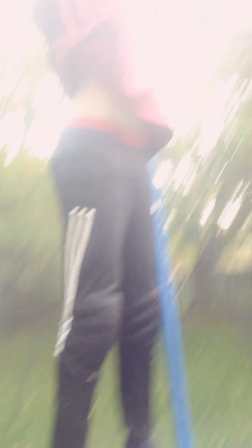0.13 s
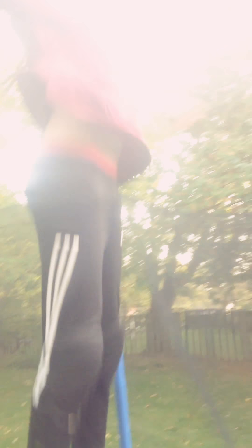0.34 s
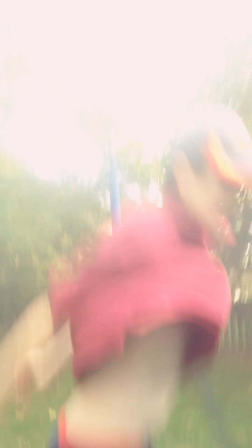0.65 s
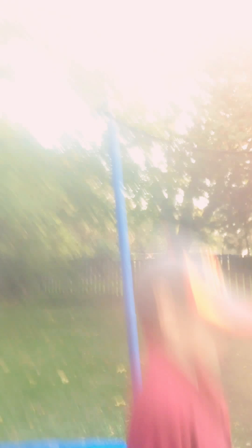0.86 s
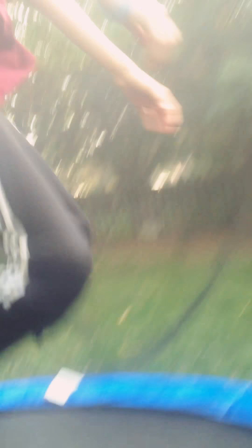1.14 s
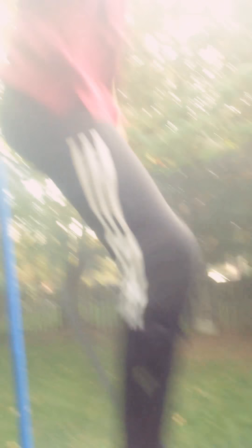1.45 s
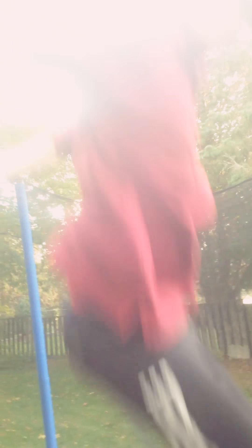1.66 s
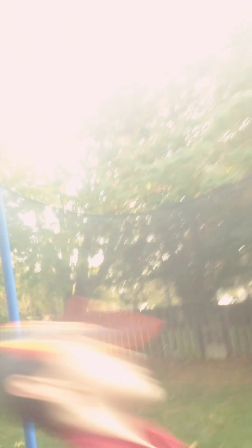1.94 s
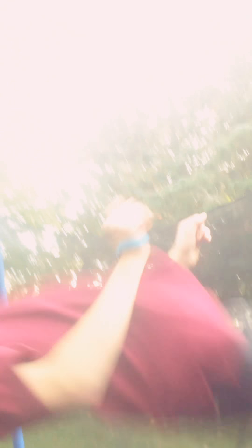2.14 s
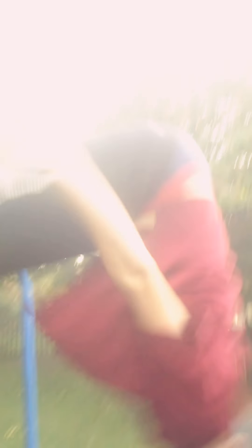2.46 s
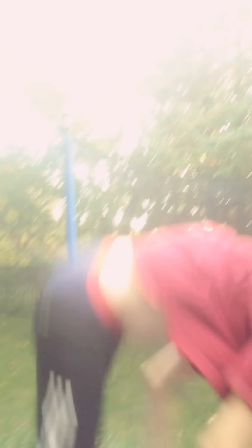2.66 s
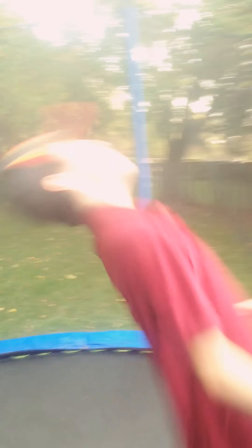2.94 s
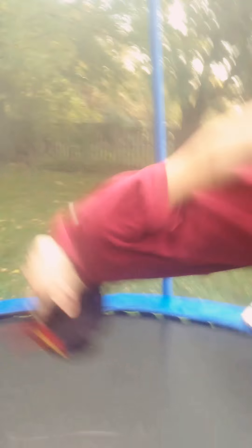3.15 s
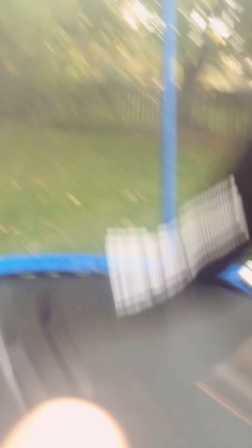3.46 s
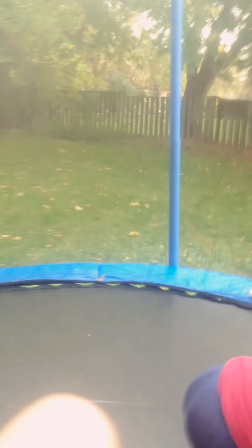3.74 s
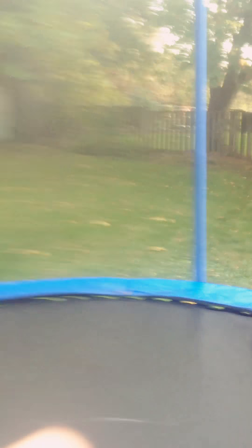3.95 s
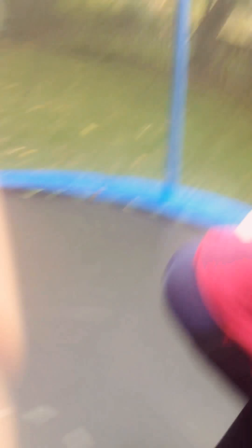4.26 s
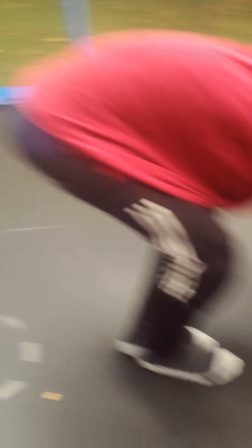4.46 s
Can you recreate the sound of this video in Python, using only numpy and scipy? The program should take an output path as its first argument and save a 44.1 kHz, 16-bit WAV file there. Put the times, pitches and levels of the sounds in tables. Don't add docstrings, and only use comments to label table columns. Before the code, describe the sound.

Close handheld phone in an open garden with almost no echo. Trampoline springs are already jangling, then three landings about a second apart bring dense bright steel rattle and dull mat thumps, the third hardest. Loose rings ping and wires tick between them. A heavier scramble of thuds and a sharp rattle follows, then the springs settle over faint leaves and distant traffic.

```python
import sys
import numpy as np
from scipy import signal
from scipy.fft import rfft, irfft
from scipy.io import wavfile
from scipy.ndimage import uniform_filter1d

SR = 44100
rng = np.random.default_rng(int(sys.argv[2]) if len(sys.argv) > 2 else 0)


def invert_db(x):
    u = np.asarray(x, float) / 20
    return 10 ** u


def transcribe(u):
    v = np.clip(np.atleast_2d(u).T, -1, 1)
    q = np.round(v * 32767).astype(np.int16)
    wavfile.write(sys.argv[1], SR, q)


N = 203054

# frequency in Hz, density in dB per Hz.
GARDEN_SPECTRUM = [(25, -33), (50, -12), (100, -7), (160, -2), (500, 1), (1000, 0), (1600, -3), (2100, -7),
                   (3200, -10), (4200, -7), (5300, -4.5), (6300, -10), (8000, -20), (12000, -32.5),
                   (15500, -24)]
# start in
# seconds, level in dB, tone in Hz, T60 in seconds.
KNOCKS = [(.745, -52, 100, .07), (1.845, -52, 105, .07), (3.6, -50, 110, .09), (4.3505, -34, 4600, .008),
          (4.564, -47, 4300, .012), (.579, -58, 326, .05), (.609, -52, 410, .045), (.606, -60, 190, .05),
          (.33, -45, 1290, 0.013), (.33, -40.5, 3220, 0.011), (1.178, -45.5, 1330, 0.015),
          (1.37, -60, 1538, .1), (1.46, -62, 1580, 0.045), (2.1, -54, 480, 0.044), (2.3, -56, 474, 0.035),
          (2.52, -53, 1650, 0.014), (2.52, -51, 3380, 0.014), (2.61, -60, 1620, 0.04),
          (4.42, -53, 1050, 0.016)]
# start in seconds, then levels in dB of tick, top tone, middle tones, low tone.
PINGS = [(.1277, -36, -37, -35.5, -40), (.2673, -37, -42, -55, -49), (.3483, -38, -43, -44, -41),
         (.588, -45, -54, -64, -53), (1.077, -25, -53, -43, -47), (1.2261, -37, -43, -43, -40),
         (1.467, -20, -42, -46, -46), (2.0842, -33, -38, -34, -31), (2.2024, -24, -49, -43, -54),
         (2.2697, -52, -58, -47, -34), (2.374, -32, -50, -37, -42), (2.3974, -15, -38, -34, -41),
         (2.4628, -50, -67, -42, -39.5), (2.591, -37, -38, -54, -36), (2.6993, -46, -56, -54, -37),
         (2.7093, -46, -44, -48, -37), (2.9028, -34, -31, -45, -21), (3.008, -44, -24, -31.5, -24),
         (3.1938, -35, -41, -30, -38), (3.3149, -46, -49, -46, -41), (3.8544, -43, -44, -41, -36),
         (3.9694, -45, -45, -50, -29), (4.1372, -36, -38, -33, -38.5), (4.4173, -50, -45, -60, -34.5)]
RING_HZ = [15090, 11780, 10010, 4090]
# split in Hz, T60 in seconds.
RING_PAIRS = [(95, 0.087), (40, 0.041), (70, 0.051), (30, 0.026)]
# start in seconds, peak in dB, centre in Hz, treble share in dB.
TICKS = [(.2664, -14, 4810, -32), (.3014, -34, 4200, -19), (.3313, -17, 3180, -31), (.3677, -28, 5610, -40),
         (.578, -40, 4170, -21), (.586, -25, 5500, -30), (1.2245, -25, 5270, -24), (1.264, -21, 4170, -35),
         (1.3214, -24, 5510, -25), (1.3488, -24, 4910, -28), (1.466, -26, 4040, -16),
         (1.5678, -47, 4950, -36), (2.2513, -26, 4020, -37), (2.387, -21, 3890, -16),
         (2.4002, -19.5, 4040, -10), (2.4144, -24, 5220, 0), (2.4633, -32, 4000, -26),
         (2.4892, -39, 3470, -28), (2.5666, -31, 4930, -22), (2.5905, -19.5, 4280, -21),
         (2.7051, -18.5, 4300, -32), (2.711, -22, 3950, -30), (2.7402, -33, 4370, -43),
         (2.7733, -28, 4160, -40), (2.802, -42, 4610, -29), (3.531, -30, 4290, -42),
         (4.3505, -23, 4650, -45), (4.564, -32, 4290, -35)]
# frequency in Hz, density in dB per Hz.
BOOM_SPECTRUM = [(18, -36), (30, -51), (95, -2), (156, 1.5), (337, -2), (524, -5), (613, -10), (900, -18.5),
                 (1170, -37), (1980, -120)]
# time in seconds, boom in dB.
SAGS = [
    (.02, -51),
    (.91, -44),
    (2.01, -41.5),
    (2.28, -54),
    (2.96, -39),
    (3.77, -43.5),
]
# start in seconds, peak in dB, pitch in Hz, slap share in dB.
THUDS = [(.208, -44, 170, -13), (.746, -24.5, 183, -25), (.876, -21, 176.5, -7), (.994, -41, 128, -17),
         (1.842, -22, 165, -19.5), (1.861, -29, 158, -15.5), (1.975, -25.5, 182, -7),
         (2.789, -19.5, 199, -20.5), (2.801, -29, 161, -19), (2.909, -20, 212, -10),
         (2.924, -23.5, 140, -9.5), (3.591, -14.5, 166, -16), (3.608, -30, 170, -18.5),
         (3.667, -28, 204, -11), (3.692, -19, 211, -18), (3.709, -28, 217, -8), (3.747, -35, 172, -19),
         (3.767, -21, 127, -13.5), (3.789, -30.5, 168, -12)]
# frequency in Hz, density in dB per Hz.
RATTLE_SPECTRUM = [(500, -31), (800, -15.5), (1300, -12), (1900, -5.5), (2500, -6), (3200, -6),
                   (4000, -2.5), (5000, 0), (6300, -7), (8000, -15.5), (9700, -23.5), (10900, -40),
                   (12300, -24), (15500, -32)]
# frequency in Hz, level in dB.
COILS = [(1380, -5), (1690, -7.5), (1868, -4.5), (2240, -19), (2634, 3), (3108, -26), (3283, -22),
         (3521, -6.5), (3786, -4), (4048, 9), (4230, -7), (4377, 6), (4560, -9), (4790, -5), (4927, 8),
         (5067, 6), (5186, -2.5), (5330, 5), (5491, 7), (5648, -2.5), (5787, 5.5), (6190, -1), (6546, -8),
         (7100, -7)]
# start in seconds, peak in dB.
JERKS = [(.057, -12), (.144, -7), (.1855, -15), (.7985, -6), (.8744, -20), (.9807, -15), (1.1297, -15),
         (1.3488, -11), (1.8754, -14), (1.9994, -23), (2.0544, -8), (2.253, -16), (2.5666, -24),
         (2.7721, -19), (2.8015, -18), (2.8437, -3.5), (2.863, -3), (2.894, -3), (2.912, -3),
         (3.3463, -15.5), (3.529, -15), (3.6896, 4), (3.808, -6), (3.843, -9), (4.0894, -17), (4.3505, -18),
         (4.564, -19)]
# time of strongest rattle in seconds, level in dB,
# rise and fall in seconds per 20 dB.
LANDINGS = [
    (.88, -17.5, .104, .055),
    (1.94, -18, .068, .105),
    (2.914, -15, .08, .045),
]
# time of strongest rattle in seconds, level in dB,
# rise and fall in seconds per 20 dB.
SWELLS = [(.066, -30, .2, .18), (.44, -52.5, .07, .23), (1.02, -21.5, .12, .18), (1.58, -47, .03, .035),
          (1.738, -52, .04, .065), (2.116, -22.5, .11, .13), (2.185, -30, .06, .06),
          (2.392, -39.5, .03, .035), (2.588, -45.5, .047, .087), (3.034, -20, .09, .2),
          (3.228, -32, .1, .09), (3.39, -34, .08, .2), (3.472, -33, .1, .13), (3.698, -18.5, .095, .06),
          (3.85, -25, .1, .2), (3.96, -29.5, .12, .25), (4.07, -31, .15, .1), (4.358, -34, .18, .17),
          (4.514, -44, .08, .13)]
# start in seconds, level in dB, fall in seconds per 20 dB.
SHAKES = [(.188, -34, .095), (.266, -40.5, .065), (.33, -47.5, .08), (1.228, -37.5, .16),
          (1.352, -42.5, .11), (1.47, -41, .012), (2.258, -33.5, .135), (2.528, -51, .012), (2.7, -46, .3),
          (3.534, -33, .036), (4.564, -44.5, .3)]

LANDING_CURVE, RISE_CURVE = 2.5, 1.7
SHAKE_RISE_S, RATTLE_REST_DB = .008, -76
SAG_RISE_S, SAG_FALL_S, BOOM_REST_DB = .16, .13, -58
COIL_DB, COIL_SLOPE, SHIMMER_DB, SHIMMER_SLOPE = -10.5, -.08, -29, -.1
DIM_S, DIM_DB = 4.16, -5
THUD_T60_S, JERK_T60_S, TICK_T60_S = .054, .062, .013
OVERTONE_DB = -3.5
WEAK_TONE_DB = -16


def set_rms(x, db=0.):
    return x * invert_db(db) / np.sqrt(np.mean(x ** 2))


def colour(x, table):
    hz, db = np.transpose(table)
    grid_hz = np.maximum(np.arange(1025) * SR / 2048, 1)
    log_gain = np.interp(np.log(grid_hz), np.log(hz), db) * np.log(10) / 20
    cepstrum = irfft(log_gain)
    cepstrum[1:1024] *= 2
    cepstrum[1025:] = 0
    impulse = irfft(np.exp(rfft(cepstrum)))
    return signal.fftconvolve(x, impulse)[:N]


def band(x, lo_hz, hi_hz, order=2):
    edges_hz = [lo_hz, min(hi_hz, .45 * SR)]
    return signal.sosfilt(signal.butter(order, edges_hz, "band", fs=SR, output="sos"), x)


def mode(x, hz, t60_s):
    pole = np.exp(2j * np.pi * hz / SR - np.log(1000) / (t60_s * SR))
    return signal.lfilter([1], [1, -pole], x).imag


def blows(s, db):
    return np.bincount(np.int_(np.asarray(s) * SR), invert_db(np.asarray(db)), N)[:N]


def walk(rate_hz):
    hold = int(SR / rate_hz)
    steps = np.repeat(rng.standard_normal(N // hold + 1), hold)
    return 0.84 * uniform_filter1d(steps, hold)[:N]


def add(out, s, burst):
    i = int(s * SR)
    out[i:i + len(burst)] += burst[:N - i]


def swells(rows, rest_db):
    now_s = np.arange(0, N / SR, .001)
    s, db, rise_s, fall_s, curve = np.transpose(rows)[:, :, None]
    rise = (np.maximum(s - now_s, 0) / rise_s) ** curve
    fall = np.maximum(now_s - s, 0) / fall_s
    power = np.sum(invert_db(db - 20 * (rise + fall)) ** 2, axis=0) + invert_db(rest_db) ** 2
    return np.interp(np.arange(N) / SR, now_s, 10 * np.log10(power))


def garden():
    noise = colour(rng.standard_normal(N), GARDEN_SPECTRUM)
    return set_rms(noise * invert_db(1.0 * walk(2.45)), -53)


def knocks():
    out = np.zeros(N)
    for s, db, hz, t60_s in KNOCKS:
        blow = uniform_filter1d(blows([.001], [db])[:SR // 5], size=4)
        tone = mode(blow, hz, t60_s)
        partial = 0.13 * mode(blow, 1.23 * hz, 1.2 * t60_s)
        add(out, s - .001, 7 * (tone + partial))
    return out


def ticks():
    out, t = np.zeros(N), np.arange(SR // 20) / SR
    envelope = (1 - np.exp(-t / 0.0018)) * invert_db(-60 * t / TICK_T60_S)
    for s, db, hz, treble_db in TICKS:
        noise = rng.standard_normal(len(t))
        body = set_rms(band(noise, hz / 1.4, hz * 1.7, order=1))
        treble = set_rms(band(noise, 7100, 22000), treble_db - 9)
        add(out, s, invert_db(db - 4) * (body + treble) * envelope)
    return out


def pings():
    s, tick_db, top_db, middle_db, low_db = np.transpose(PINGS)
    tones_db = top_db, middle_db + WEAK_TONE_DB, middle_db, low_db
    t = np.arange(SR // 200) / SR
    scratch = rng.standard_normal(len(t)) * t / 0.00076 * np.exp(-t / 0.00077)
    out = band(signal.fftconvolve(blows(s, tick_db - 6), scratch)[:N], 8000, 19000)
    lag, loss = rng.random((len(s), 2)).T
    for db, hz, (split_hz, t60_s) in zip(tones_db, RING_HZ, RING_PAIRS):
        blow = blows(s, db + 1.0) + blows(s + .003 + 0.011 * lag, db - 3 - 8 * loss)
        blow = band(blow, .97 * hz, 1.03 * hz, order=1)
        pair = mode(blow, hz, t60_s) + invert_db(-8.5) * mode(blow, hz - split_hz, 0.55 * t60_s)
        out = out + pair * invert_db(1.9 * walk(150))
    return out


def boom():
    rows = [(s, db, SAG_RISE_S, SAG_FALL_S, RISE_CURVE) for s, db in SAGS]
    boom_db = swells(rows, BOOM_REST_DB)
    return set_rms(colour(rng.standard_normal(N), BOOM_SPECTRUM)) * invert_db(boom_db - 1.0 + 3.1 * walk(30))


def thuds():
    out, t = np.zeros(N), np.arange(SR // 4) / SR
    swell = (1 - np.exp(-t / 0.0026)) * invert_db(-60 * t / THUD_T60_S)
    slap_envelope = np.exp(-t / 0.0048) * (1 - np.exp(-t / 0.003))
    for s, db, hz, slap_db in THUDS:
        overtone = invert_db(OVERTONE_DB) * np.sin(2 * np.pi * 2.067 * hz * t) * np.exp(-t / 0.018)
        thump = np.sin(2 * np.pi * hz * t) + overtone
        slap = set_rms(band(rng.standard_normal(len(t)), 270, 970)) * slap_envelope
        add(out, s, invert_db(db + 1.5) * (swell * thump + invert_db(slap_db + 8) * slap))
    return out


def contacts(rate_hz, spread_db):
    hit, size, sign = rng.random(N), rng.exponential(size=N), rng.standard_normal(N)
    blow = (hit < rate_hz / SR) * invert_db(spread_db * np.minimum(size, 3.5)) * sign
    grit = set_rms(rng.standard_normal(N), -0.13)
    return set_rms(set_rms(blow) + grit)


def spring_motion(rattle_db):
    motion = invert_db(rattle_db)
    t = np.arange(SR // 5) / SR
    jolt = (1 - np.exp(-t / .0008)) * invert_db(-60 * t / JERK_T60_S)
    for s, db in JERKS:
        add(motion, s, invert_db(db - 20.0) * jolt)
    return motion * invert_db(1.46 * walk(60) + 1.26 * walk(160))


def springs():
    rows = [(*row, LANDING_CURVE) for row in LANDINGS]
    rows += [(*row, RISE_CURVE) for row in SWELLS]
    rows += [(s, db, SHAKE_RISE_S, fall_s, RISE_CURVE) for s, db, fall_s in SHAKES]
    rattle_db = swells(rows, RATTLE_REST_DB)
    effort_db = rattle_db + 30
    coil_db = COIL_DB + COIL_SLOPE * effort_db
    dimmed = np.arange(N) / SR > DIM_S
    shimmer_db = SHIMMER_DB + SHIMMER_SLOPE * effort_db + DIM_DB * dimmed
    motion = spring_motion(rattle_db)

    edges_hz = 700 * 2 ** np.arange(0, 4.1, .5)
    groups = []
    for lo_hz, hi_hz in zip(edges_hz, edges_hz[1:]):
        steel = colour(contacts(1800, spread_db=3.0), RATTLE_SPECTRUM)
        groups.append(band(steel, lo_hz, hi_hz) * invert_db(1.67 * walk(30)))
    lows = set_rms(sum(groups[:4])) * invert_db(coil_db - 0.4)
    mids = set_rms(sum(groups[4:8]))
    shimmer = set_rms(band(colour(contacts(6000, spread_db=4.0), RATTLE_SPECTRUM), 11100, 15000))
    tops = shimmer * invert_db(np.minimum(shimmer_db, -22) + 2.5)

    drive = contacts(700, spread_db=3.5) * motion
    ring = sum(invert_db(db) * mode(drive * invert_db(5 * walk(28)), hz, t60_s=.045) for hz, db in COILS)
    return (mids + lows + tops) * motion * invert_db(-1.5) + set_rms(ring, -33.0)


def scene():
    near = knocks() + ticks() + pings() + boom() + thuds() + springs()
    near = signal.sosfilt(signal.butter(3, 90, "high", fs=SR, output="sos"), near)
    t = np.arange(SR // 6) / SR
    tail = rng.standard_normal(len(t)) * invert_db(-60 * t / 0.11)
    yard = signal.fftconvolve(band(near, 170, 5800, order=1), tail)[:N] * invert_db(-38.5)
    return (near + yard + garden())[None]


def band_limit(x):
    return signal.sosfilt(signal.butter(12, 16630, fs=SR, output="sos"), x)


def record(dry):
    cut = signal.sosfilt(signal.ellip(10, .2, 80, 15300, fs=SR, output="sos"), dry)
    notched = signal.lfilter(*signal.iirnotch(10900, 7, fs=SR), cut)
    mix = .4 * cut + .6 * notched
    return band_limit(mix)


dry = scene()
out = record(dry)
transcribe(out)
```